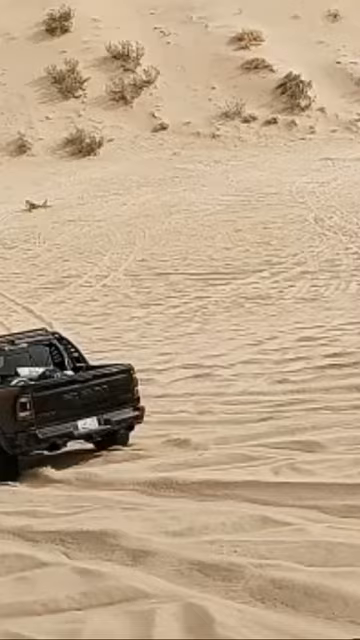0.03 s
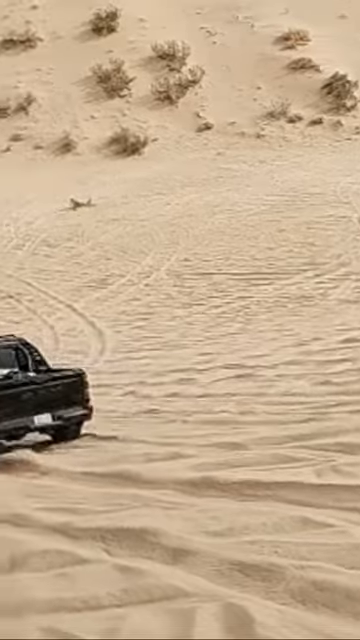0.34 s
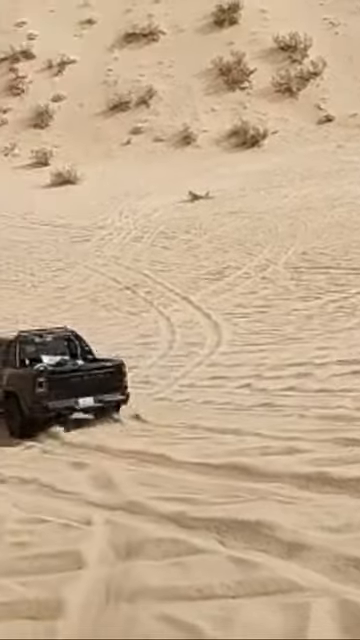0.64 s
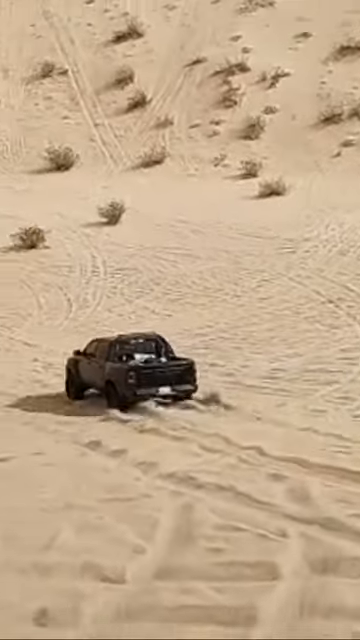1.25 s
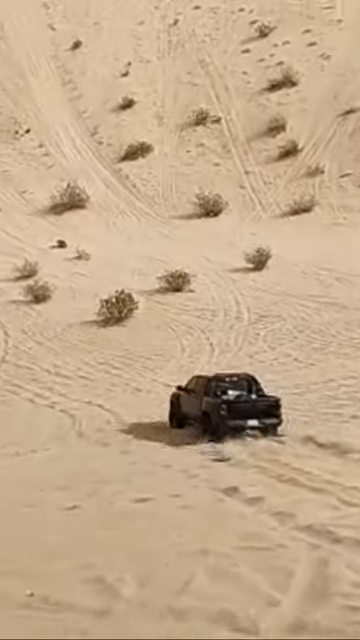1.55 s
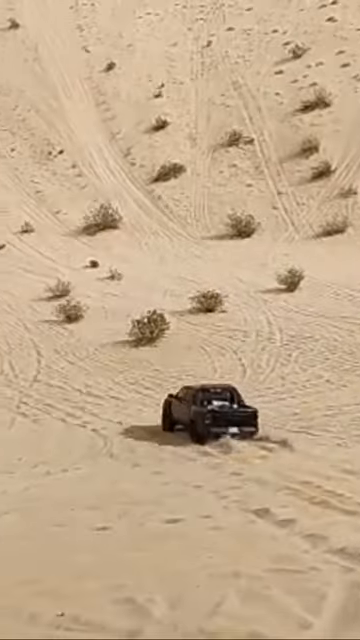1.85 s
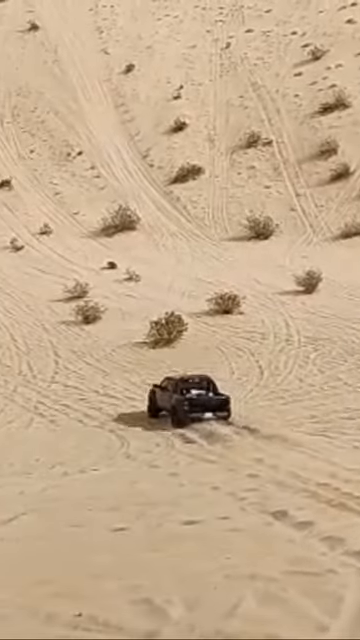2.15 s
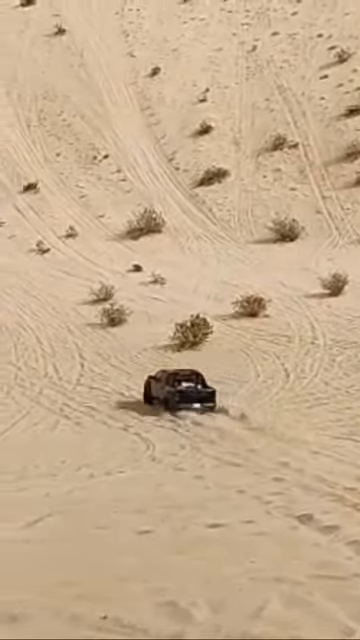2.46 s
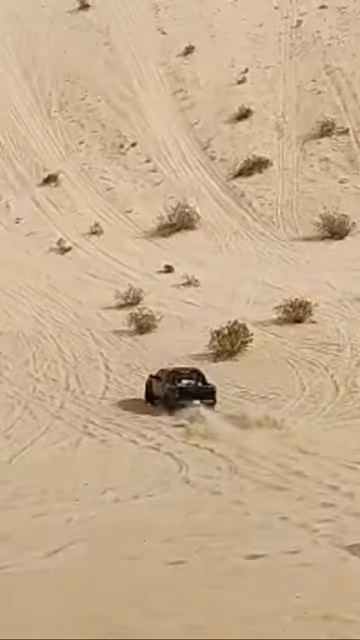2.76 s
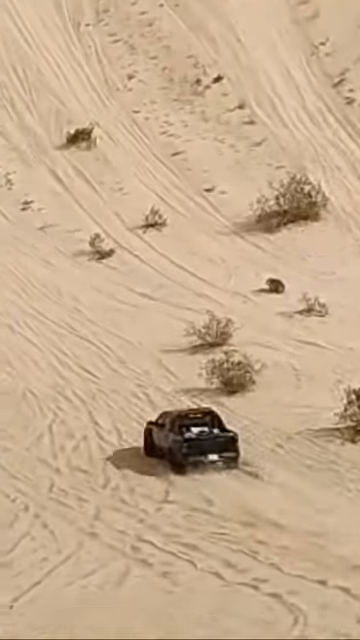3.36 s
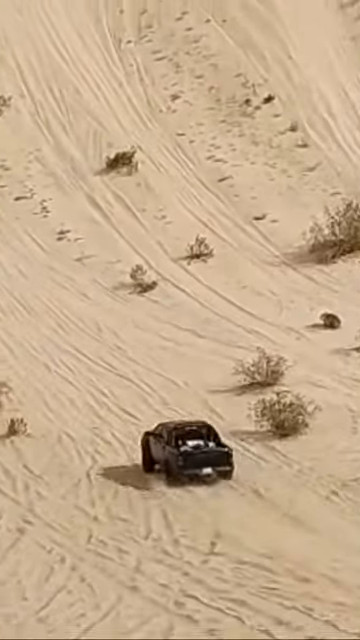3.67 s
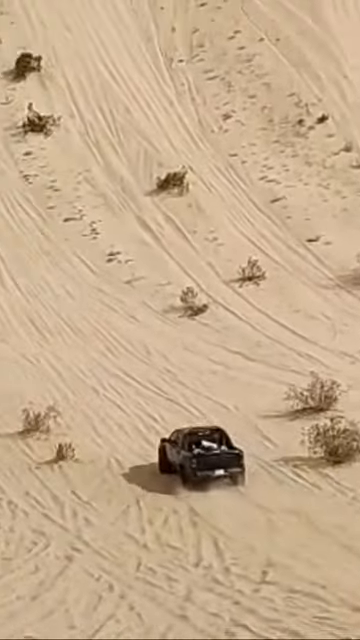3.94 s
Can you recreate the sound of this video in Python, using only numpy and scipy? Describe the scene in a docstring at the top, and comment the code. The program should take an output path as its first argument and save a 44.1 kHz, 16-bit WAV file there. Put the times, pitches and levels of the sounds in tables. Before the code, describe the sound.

A loud pickup truck exhaust cuts in at about 0.3 seconds, booming and rumbling. It revs up until 1.2 seconds, turning raspy, with sharp cracks near 0.8 and from 1.2 to 1.8 seconds. The pitch drops at a gear shift around 1.6 seconds and climbs again until 2.3. The engine then drones on steadily and duller, with a brief thin whistle and a faint nasal ring around 3 seconds.

```python
"""A loud open exhaust cuts in abruptly, booming and rumbling: a pickup truck pulls away over sand.
It revs up, shifts gear with a few cracks and pulls on. The pipe booms on the fifth order of the engine
cycle. Each crest of that wave steepens into a rasping pulse, brightest under full throttle; uneven
combustion adds the rumble. Thin whistles and a nasal ring come and go."""
import sys
import numpy as np
from scipy import signal
from scipy.fft import rfft, irfft
from scipy.io import wavfile
from scipy.ndimage import uniform_filter1d

SR = 44100
rng = np.random.default_rng(int(sys.argv[2]) if len(sys.argv) > 2 else 0)


def to_wav(sig):
    """Store sig (one row per channel, or 1-D mono) as 16-bit WAV at the path in sys.argv[1].

    Samples outside -1..1 are clipped; the rate is SR.
    """
    pcm = np.clip(np.atleast_2d(sig), -1, 1) * 32767
    pcm = np.round(pcm).astype(np.int16)
    wavfile.write(sys.argv[1], SR, pcm.T)  # frames by channels


N = 176400
T = np.arange(N) / SR
HZ = np.fft.rfftfreq(N, 1 / SR)

# five crests of the boom (position in the engine cycle [0-1])
CREST_PHASES = [.02, .22, .405, .61, .83]


def amp(db):
    """Decibels to gain."""
    return 10 ** (np.asarray(db) / 20)


def curve(points):
    """(time [s], value) points interpolated at every sample."""
    return np.interp(T, *np.transpose(points))


def spectrum(points):
    """(frequency [Hz], value) points interpolated at every bin, on a log axis."""
    hz, value = np.transpose(points)
    return np.interp(np.log(HZ + 1), np.log(hz + 1), value)


def swell(centre_s, half_s):
    """Gaussian envelope, 1/e at half_s from the centre."""
    return np.exp(-((T - centre_s) / half_s) ** 2)


def unit_rms(x):
    """Scale to unit rms overall."""
    return x / np.sqrt(np.mean(x ** 2) + 1e-20)


def running_unit_rms(x, window_samples=2400):
    """Scale to unit rms from moment to moment."""
    power = (np.atleast_2d(x) ** 2).mean(0)
    power = uniform_filter1d(uniform_filter1d(power, window_samples), window_samples // 2)
    return x / np.sqrt(abs(power) + 1e-20)


def wander(rate_hz, hop_samples=128):
    """Slow random drift of unit rms."""
    times_s = T[::hop_samples]
    hz = np.fft.rfftfreq(len(times_s), hop_samples / SR)
    lowpassed = rfft(rng.standard_normal(len(times_s))) / (1 + (hz / rate_hz) ** 4)
    return unit_rms(np.interp(T, times_s, irfft(lowpassed, len(times_s))))


def stereo(common, difference, colour):
    """Filter by colour and spread over left and right."""
    # channel balance (frequency [Hz], left minus right [dB])
    balance_db = [(30,-1),(70,4),(200,-4),(330,4),(500,2.5),(770,5.5),(1170,-3.5),(1790,1),(2740,-10),(3400,-4.5),(4300,2.5),(6400,4),(9800,3),(13000,-4.5)]
    # phase between channels (frequency [Hz], left lead [rad])
    lead_rad = [(20,0),(200,.15),(690,-.1),(950,-.4),(1290,-.1),(1980,-.6),(2670,-1.4),(3360,.9),(4050,.1),(6200,-.1),(9000,.6)]
    # likeness of the channels (frequency [Hz], coherence [0-1])
    likeness = [(30,.5),(70,0.23),(110,0.91),(200,0.52),(380,.95),(700,0.55),(1400,0.78),(2400,0.33),(4300,0.58),(8000,0.32),(15000,0.14)]
    coherence = np.clip(spectrum(likeness), 0, 1)
    mid = rfft(common) * np.sqrt(1 + coherence)
    side = rfft(difference) * np.sqrt(1 - coherence)
    tilt = amp(spectrum(balance_db) / 2)
    left = (mid + side) * tilt * np.exp(1j * spectrum(lead_rad))
    right = (mid - side) / tilt
    return irfft(np.array([left, right]) * colour, N)


def drone(cycles, pan_db=1.06, spread=0.094):
    """Low engine orders in the pipe, each fluttering and drifting between left and right."""
    # pipe boom, order 5 (time [s], level [dB])
    boom_db = [(.34,-15.5),(.53,-14.5),(.56,-19),(.6,-12),(.72,-11.5),(1.0,-15.5),(1.19,-17),(1.23,-23.5),(1.32,-26.5),(1.35,-15.5),(1.45,-17.5),(1.55,-15),(1.65,-23),(1.75,-21),(1.9,-14.5),(2.18,-17.5),(2.3,-15),(2.57,-19.5),(2.85,-15),(3.1,-16),(3.4,-15),(3.72,-22),(3.82,-17),(4,-15.5)]
    # lope from unequal cylinders (time [s], level [dB]) and {order: relative level [dB]}
    lope_db = [(.34,-29.5),(.55,-33),(.78,-42),(1.0,-24.5),(1.18,-21.5),(1.25,-32),(1.38,-24),(1.55,-28),(1.8,-32),(2.1,-29),(2.3,-24),(2.6,-24.5),(2.9,-34.5),(3.25,-30),(3.55,-43.5),(4,-36)]
    lope_orders = {1: -21.5, 2: -10, 3: 0, 4: 0, 7: -2.4, 9: -9.5}
    # growl, order 6 and higher (time [s], level [dB]) and {order: relative level [dB]}
    growl_db = [(.34,-19),(.55,-23.5),(.7,-16.5),(.88,-29.5),(1.0,-28),(1.15,-25),(1.35,-36),(1.5,-20.5),(1.62,-25.5),(1.8,-24),(2.05,-31.5),(2.3,-23),(2.6,-26.5),(3.25,-28),(3.65,-37),(3.9,-29.5)]
    growl_orders = {6: 0, 10: -10.5, 11: -14.5, 12: -19}
    # firing, order 8 and higher (time [s], level [dB]) and {order: relative level [dB]}
    firing_db = [(.34,-20.5),(.5,-20),(.7,-29),(.88,-23),(1.0,-39),(1.3,-38),(1.55,-26),(1.8,-19.5),(1.95,-20.5),(2.2,-21),(2.4,-28),(2.7,-26),(2.9,-39),(4,-41.5)]
    firing_orders = {8: 0, 9: -7.5, 13: -10, 14: -12.5, 15: -16.5}

    def tone(order, flutter, phase):
        wave = np.exp(2j * np.pi * (order * cycles + phase))
        modulation = 1 + flutter * (wander(14) + 1j * wander(11)) / np.sqrt(2)
        return np.sqrt(2) * (wave * modulation).real

    def group(level_db, orders, flutter):
        tones = sum(amp(db) * tone(order, flutter, rng.random()) for order, db in orders.items())
        return amp(curve(level_db)) * tones

    boom = amp(curve(boom_db)) * tone(len(CREST_PHASES), flutter=0.071, phase=0)
    others = (group(lope_db, lope_orders, flutter=0.33)
              + group(growl_db, growl_orders, flutter=0.46)
              + group(firing_db, firing_orders, flutter=0.45))
    side = (signal.hilbert(boom + others) * (wander(3) + 1j * wander(4))).real / np.sqrt(2)
    return boom + others * amp([[pan_db], [-pan_db]]) + spread * np.array([side, -side])


def pipe_band(lo_hz, hi_hz, order=14):
    """One band of the exhaust's response, as a ringing minimum-phase filter."""
    # exhaust spectrum (frequency [Hz], relative level [dB])
    exhaust_db = [(180, -26), (300, -6), (326, -0.5), (372, -4), (470, -10.5), (537, -13.5), (624, -15),
                  (774, -15), (842, -15), (1190, -21), (1340, -13), (1530, -14.5), (1690, -11.5),
                  (2000, -14.5), (2320, -22.5), (2610, -17.5), (2840, -20.5), (3240, -9), (3760, -13.5),
                  (4230, -7.5), (6200, -31), (8220, -32), (9880, -42), (15000, -37), (16000, -39.5)]
    # tailpipe resonances (frequency [Hz], width [Hz], peak [dB])
    modes = [(525,42,3.5),(1367,23,4),(2726,31,6),(3070,20,4.5),(4070,35,7)]
    modes_db = sum(db / (1 + (2 * (HZ - hz) / width_hz) ** 2) for hz, width_hz, db in modes)
    rolloff = np.sqrt((1 + (lo_hz / (HZ + 1)) ** order) * (1 + (HZ / hi_hz) ** order))
    gain = amp(spectrum(exhaust_db) + modes_db) / rolloff
    log_gain = np.log(np.maximum(gain / gain.max(), 1e-5))
    mirrored = np.r_[log_gain, log_gain[-2:0:-1]]
    return np.exp(np.conj(signal.hilbert(mirrored)))[:len(HZ)]


def turbulence(cycles, memory, points_per_cycle=1024):
    """Gas noise that partly repeats each cycle, so its overtones glide with the engine."""
    fresh = rng.standard_normal((int(cycles[-1]) + 2, points_per_cycle))
    flow = signal.lfilter([1], [1, -memory], fresh, axis=0).ravel()
    return unit_rms(np.interp(cycles * points_per_cycle, np.arange(len(flow)), flow))


def pulses(cycles, level_db, colour, gain_db, contrast, scatter_db, noise_share, puff_s, memory):
    """Each crest fires a sharp front and a puff of turbulent gas into one exhaust band."""
    # crest steepening, shifting with speed and load (time [s], relative strength of crests 1-5 [dB])
    steepening = [(0.749,-8,4.5,5,-8.5,-0.26),(1.0,-2.5,-9,3,-6.5,0.24),(1.549,2,-9,-2.5,-10.5,-0.088),(1.801,-5,-18,0.5,-9.5,-0.26),(2.3,-4,-11.5,0.5,-5.5,-0.71),(2.651,-4,10,-11,-3,-1.2),(2.85,-22,-10.5,-14,-19,0.25)]
    # even flow between pulses, greater at light throttle (time [s], level re puffs [dB])
    flow_db = [(.34,-3),(.66,-8.5),(.75,-19.5),(2.1,-13.5),(2.3,-4),(2.7,-5),(2.87,-19.5),(3.3,-17),(3.45,1.5),(3.8,-2),(3.88,-18),(4,-14)]
    fronts, power = np.zeros(N), np.zeros(N)
    times_s, *strengths_db = np.transpose(steepening)
    for phase, strength_db in zip(CREST_PHASES, strengths_db):
        crest_cycles = np.arange(int(cycles[-1] - phase) + 1) + phase
        at = np.interp(crest_cycles, cycles, np.arange(N)).clip(0, N - 2)
        jitter_db = scatter_db * np.clip(rng.standard_normal(len(at)), -2, 2)
        size = amp(contrast * np.interp(at / SR, times_s, strength_db) + jitter_db)
        sample, fraction = at.astype(int), at % 1
        fronts[sample] += size * (1 - fraction)
        fronts[sample + 1] += size * fraction
        power[sample] += size ** 2
    puffs = np.sqrt(signal.lfilter([1], [1, -np.exp(-2 / (puff_s * SR))], power + 1e-9))
    flow = amp(curve(flow_db))
    envelope = np.hypot(running_unit_rms(puffs), flow)
    gas_share = 1 - (1 - noise_share) / (1 + flow) ** 2  # even flow weakens the fronts
    gas_mid = unit_rms(envelope * turbulence(cycles, memory))
    gas_side = unit_rms(envelope * turbulence(cycles, memory))
    drive = np.sqrt(1 - gas_share) * running_unit_rms(fronts) + np.sqrt(gas_share) * gas_mid
    return amp(curve(level_db) + gain_db) * running_unit_rms(stereo(drive, gas_side, colour))


def exhaust_rasp(cycles):
    """Steepened crests leave the pipe as pulses in six bands, throat to sizzle."""
    # band envelopes (time [s], level before gain_db [dB])
    throat_db = [(0.34, -25), (0.41, -32), (0.53, -22.5), (0.98, -33), (1.13, -22), (1.29, -27.5),
                 (1.34, -23), (1.57, -26), (2.38, -21.5), (3.01, -31.5), (3.33, -25.5), (3.77, -48.5),
                 (3.87, -27.5), (3.98, -30.5)]
    bark_db = [(0.34, -24), (0.36, -32.5), (0.47, -27.5), (0.87, -26.5), (1.14, -24), (1.26, -38),
               (1.6, -26.5), (1.66, -35), (1.72, -27.5), (1.74, -38), (1.87, -27), (3.29, -34),
               (3.31, -26.5), (3.72, -44), (3.89, -22), (3.98, -29.5)]
    snarl_db = [(0.34, -27.5), (0.36, -35), (0.79, -22.5), (1.25, -25.5), (1.27, -31), (1.36, -20.5),
                (1.43, -28), (1.46, -20.5), (1.56, -33.5), (1.61, -24), (1.64, -34.5), (1.93, -24.5),
                (2.25, -28.5), (2.48, -22.5), (2.77, -31.5), (3.23, -24), (3.56, -46.5), (3.8, -45),
                (3.87, -33.5), (4.0, -28.5)]
    rasp_db = [(0.34, -52.5), (0.68, -44), (0.76, -23), (1.19, -17.5), (1.31, -29), (1.34, -15),
               (1.42, -31), (1.46, -15.5), (1.54, -23), (1.62, -16.5), (1.66, -39), (1.69, -23),
               (1.78, -22), (2.0, -18), (2.3, -29), (2.51, -26), (2.87, -36), (2.88, -29.5), (3.14, -39),
               (3.21, -26.5), (3.5, -68.5), (3.82, -80.5), (3.88, -48), (3.98, -47)]
    crackle_db = [(0.34, -61), (0.72, -67), (0.76, -36), (1.19, -28.5), (1.33, -37.5), (1.35, -25),
                  (1.42, -57), (1.48, -34), (1.51, -39.5), (1.64, -27.5), (1.65, -55), (1.68, -29),
                  (1.81, -37), (1.82, -24.5), (1.86, -32), (2.0, -29.5), (2.26, -43), (2.46, -38.5),
                  (2.81, -58.5), (3.16, -60.5), (3.56, -89), (3.98, -69)]
    sizzle_db = [(0.34, -78), (0.75, -78), (0.76, -45), (1.17, -41.5), (1.21, -32), (1.32, -59),
                 (1.34, -42), (1.4, -63), (1.47, -61), (1.48, -42), (1.54, -46), (1.62, -30), (1.63, -43),
                 (1.99, -35.5), (2.31, -59.5), (2.55, -53), (2.79, -81), (3.98, -85)]
    return (pulses(cycles, throat_db, pipe_band(333, 704), gain_db=-1, contrast=0.58,
                   scatter_db=4, noise_share=0.81, puff_s=0.0071, memory=0.66)
            + pulses(cycles, bark_db, pipe_band(640, 1100), gain_db=-0.5, contrast=0.4,
                     scatter_db=3.5, noise_share=0.67, puff_s=0.0074, memory=0.65)
            + pulses(cycles, snarl_db, pipe_band(1150, 2420), gain_db=0, contrast=0.5,
                     scatter_db=2.5, noise_share=0.91, puff_s=0.003, memory=0.854)
            + pulses(cycles, rasp_db, pipe_band(2500, 5400), gain_db=-0.5, contrast=0.93,
                     scatter_db=3, noise_share=0.96, puff_s=0.0025, memory=0.867)
            + pulses(cycles, crackle_db, pipe_band(5630, 11000), gain_db=3, contrast=1.6,
                     scatter_db=3.5, noise_share=1, puff_s=0.0039, memory=0.52)
            + pulses(cycles, sizzle_db, pipe_band(10000, 14000), gain_db=4, contrast=2.1,
                     scatter_db=4, noise_share=0.91, puff_s=0.0021, memory=0.46))


def rumble(gain_db=3):
    """Uneven combustion shakes the pipe's lowest resonances."""
    # rumble envelope (time [s], level before gain_db [dB])
    level_db = [(0.34, -32), (0.44, -23), (0.57, -19), (0.82, -49), (0.99, -25.5), (1.71, -35),
                (2.19, -31.5), (2.21, -21), (2.9, -29), (2.95, -26), (3.15, -29.5), (3.58, -24.5),
                (3.67, -24.5), (3.69, -22), (3.77, -28.5), (4.0, -23.5)]
    # rumble spectrum (frequency [Hz], relative level [dB])
    colour_db = [(20,-27),(50,-23),(62,-7),(74,6.5),(88,1),(130,1),(200,-6),(300,-12),(450,-25),(800,-28),(2000,-68)]
    noise = stereo(*rng.standard_normal((2, N)), amp(spectrum(colour_db)))
    return amp(curve(level_db) + gain_db) * unit_rms(noise)


def whistles(waver_hz=25):
    """Short, thin, slightly wavering high tones."""
    # whistles (centre [s], half length [s], frequency [Hz], level [dB])
    events = [(0.55,0.026,8140,-61.5),(2.44,0.055,8140,-42)]
    sound = np.zeros(N)
    for centre_s, half_s, hz, db in events:
        phase_rad = 2 * np.pi * np.cumsum(hz + waver_hz * wander(60)) / SR
        sound += amp(db) * swell(centre_s, half_s) * np.sin(phase_rad)
    return sound


def nasal_ring(cycles, flutter=0.4):
    """Single high engine orders swell and fade."""
    # ringing orders (order, centre [s], half length [s], level [dB])
    events = [(33,2.99,0.14,-33.5),(32,3.23,0.18,-34.5),(40,3.21,0.18,-30.5),(18,3.01,0.21,-38),(18,3.92,0.1,-45),(40,0.68,0.065,-27.5)]
    sound = np.zeros(N)
    for order, centre_s, half_s, db in events:
        envelope = amp(db) * swell(centre_s, half_s) * (1 + flutter * wander(22))
        phase_rad = 2 * np.pi * order * cycles + flutter * wander(25)
        sound += envelope * np.sqrt(2) * np.cos(phase_rad)
    return sound


def cracks(decay_s=0.00074, gain_db=5.5):
    """Single bursts of gas, much sharper than the pulses around them."""
    # exhaust cracks (time [s], level before gain_db [dB])
    events = [(0.7382,-31),(0.767,-21),(0.7709,-16),(0.7932,-14.5),(1.2068,-29.5),(1.218,-10.5),(1.2355,-14),(1.244,-20),(1.339,-21),(1.448,-24.5),(1.486,-6.5),(1.58,-15.5),(1.61,-10),(1.616,-12),(1.6657,-14.5),(1.687,-11.5),(1.7165,-11),(1.822,-17.5),(3.21,-28),(3.236,-27)]
    envelope = sum(amp(db) * (T >= at_s) * np.exp(-abs(T - at_s) / decay_s) for at_s, db in events)
    colour = pipe_band(2100, 16000, order=3)
    colour /= np.sqrt(np.mean(abs(colour) ** 2))
    bursts = envelope * rng.standard_normal((2, N))
    return amp(gain_db) * stereo(*bursts, colour)


def ignition_cuts():
    """Gain dips as the ignition drops out during the shift."""
    # dropouts (time [s], half length [s], depth [dB])
    cuts = [(1.214,0.003,-8),(1.229,0.0046,-9.5),(1.664,0.0093,-4.5)]
    return amp(sum(db * swell(centre_s, half_s) for centre_s, half_s, db in cuts))


def scene():
    """Drone, ring and rasp follow one engine cycle; rumble, cracks and whistles join them."""
    # engine speed, one cycle per two crank turns (time [s], cycle rate [Hz])
    speed_hz = [(0.0, 31.22), (0.36, 31.98), (0.64, 34.77), (0.82, 37.21), (0.92, 40.63), (1.05, 46.76),
                (1.18, 51.11), (1.25, 47.36), (1.31, 49.38), (1.38, 49.05), (1.56, 41.4), (1.67, 33.25),
                (1.76, 34.99), (1.88, 36.02), (2.25, 42.31), (2.31, 44.93), (2.41, 43.87), (2.51, 45.72),
                (2.61, 43.71), (2.69, 44.86), (2.79, 43.2), (3.0, 41.81), (3.22, 43.09), (3.45, 41.36),
                (3.74, 42.25), (3.87, 42.82), (4.0, 44.69)]
    cycles = np.cumsum(curve(speed_hz)) / SR
    engine = drone(cycles) + nasal_ring(cycles) + exhaust_rasp(cycles) + rumble()
    return engine * ignition_cuts() + cracks() + whistles()


def record(dry):
    """Abrupt onset, soft-clipped peaks, steep low-pass."""
    start_s, rise_s, cutoff_hz = 0.335, 0.002, 16000
    gated = dry * np.clip((T - start_s) / rise_s, 0, 1)
    clipped = gated / (1 + gated ** 8) ** (1 / 8)
    lowpass = signal.firwin(511, cutoff_hz, window=("kaiser", 9), fs=SR)
    return signal.oaconvolve(clipped, lowpass[None], "same")


dry = scene()
out = record(dry)
to_wav(out)
```